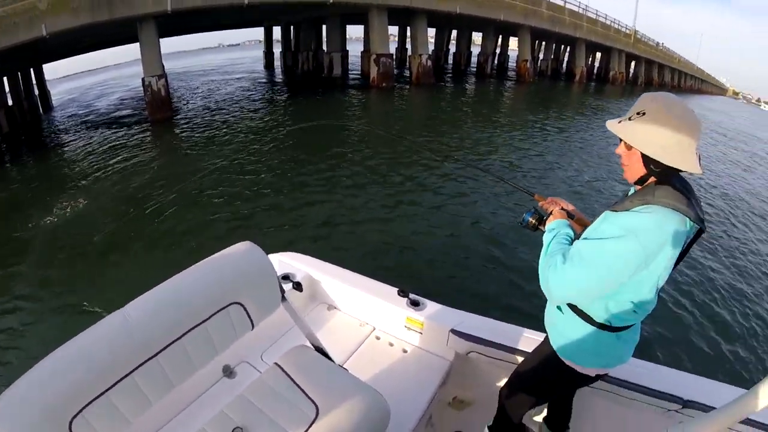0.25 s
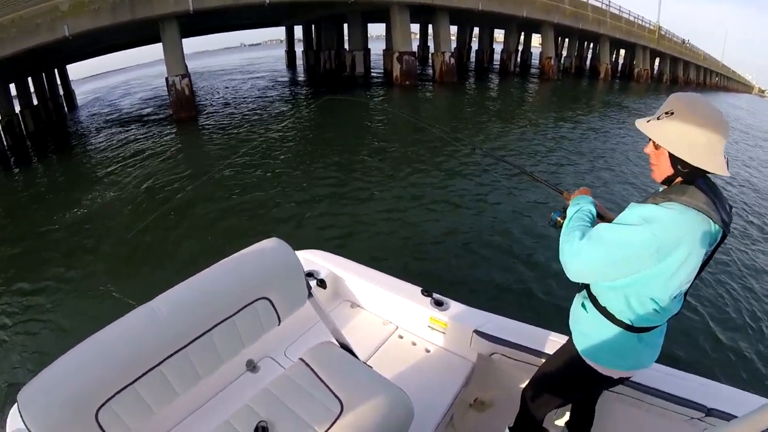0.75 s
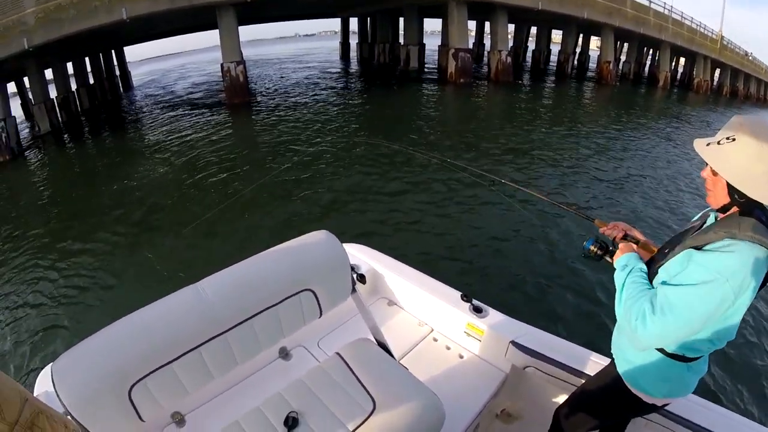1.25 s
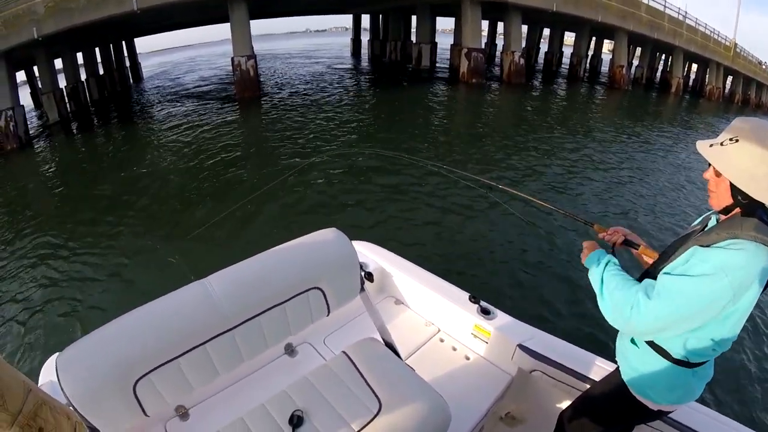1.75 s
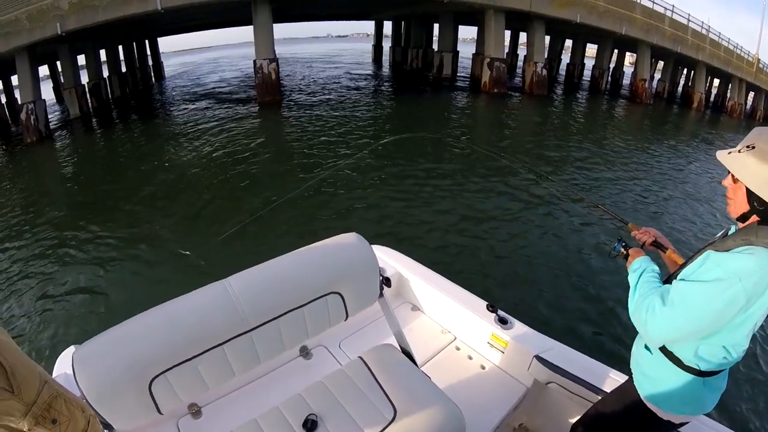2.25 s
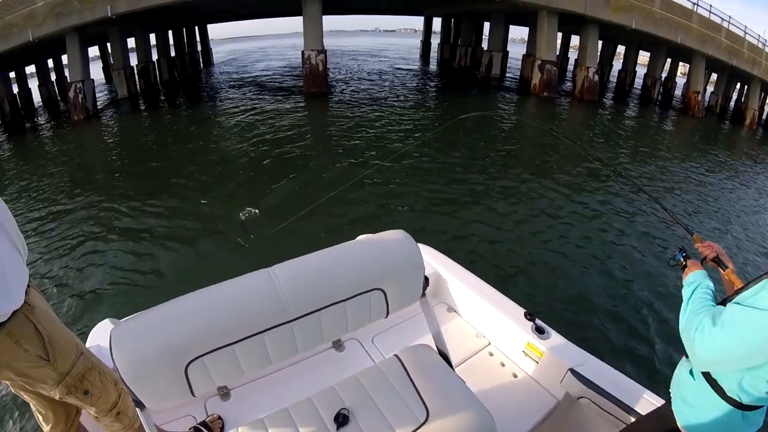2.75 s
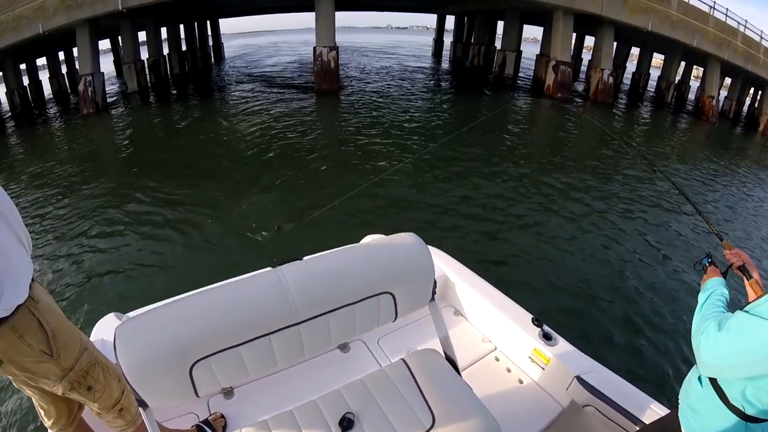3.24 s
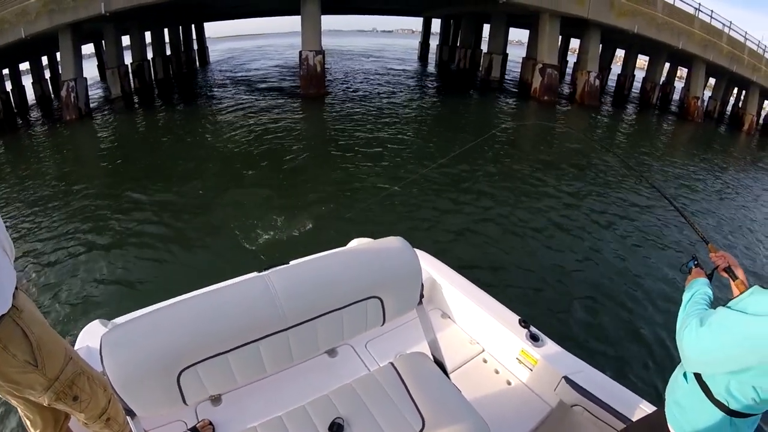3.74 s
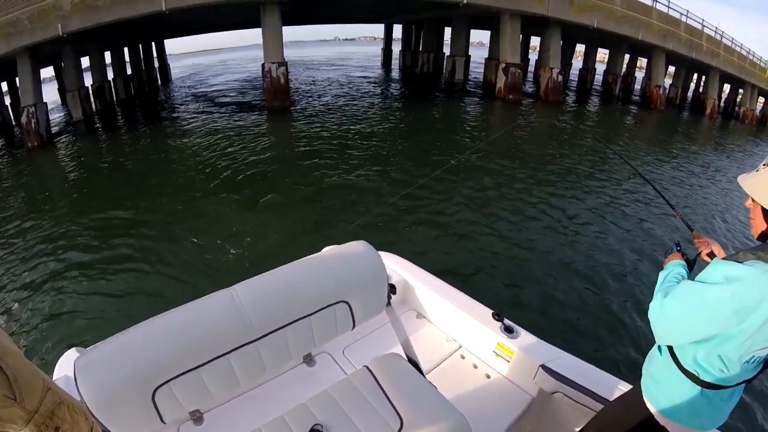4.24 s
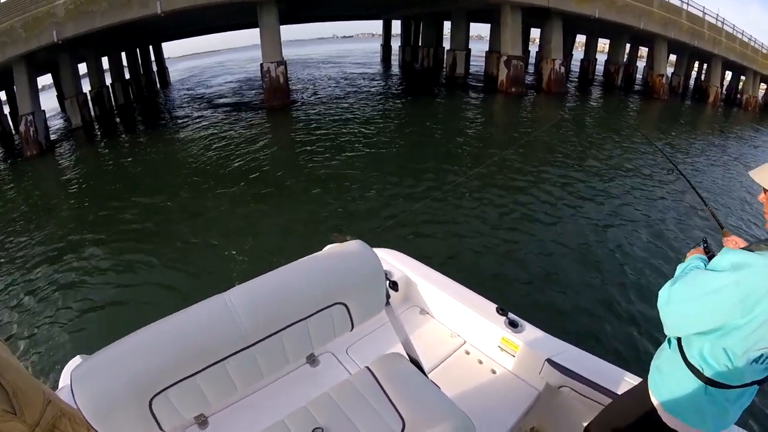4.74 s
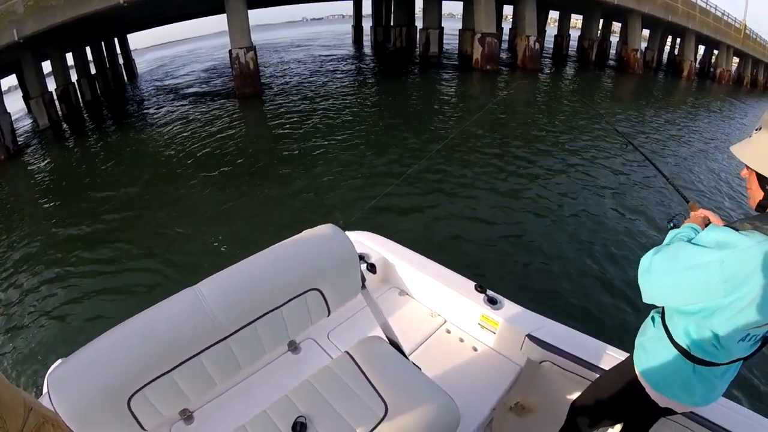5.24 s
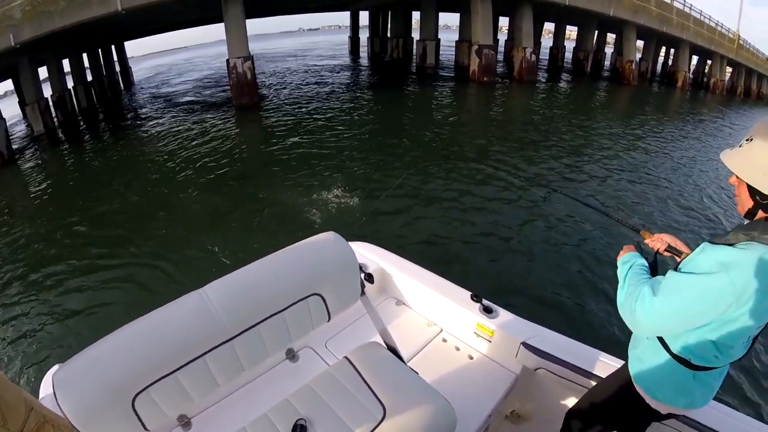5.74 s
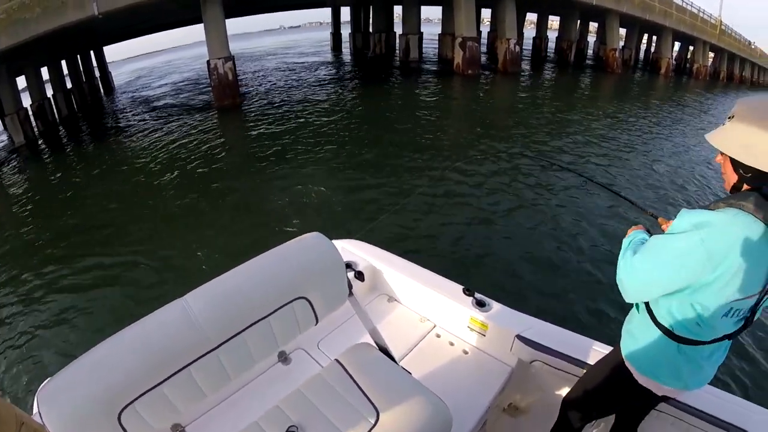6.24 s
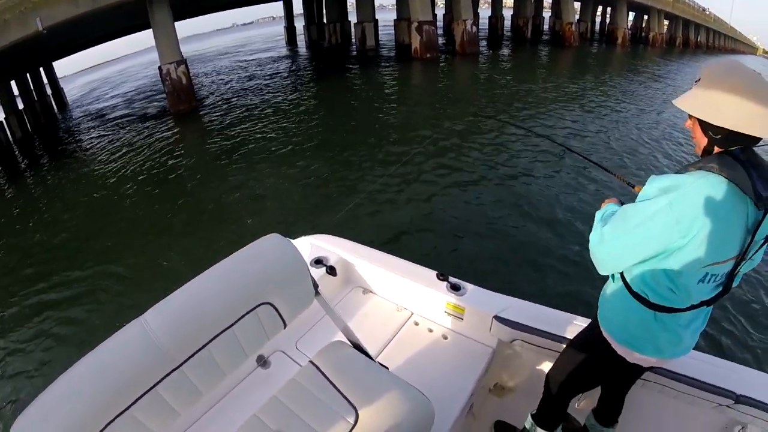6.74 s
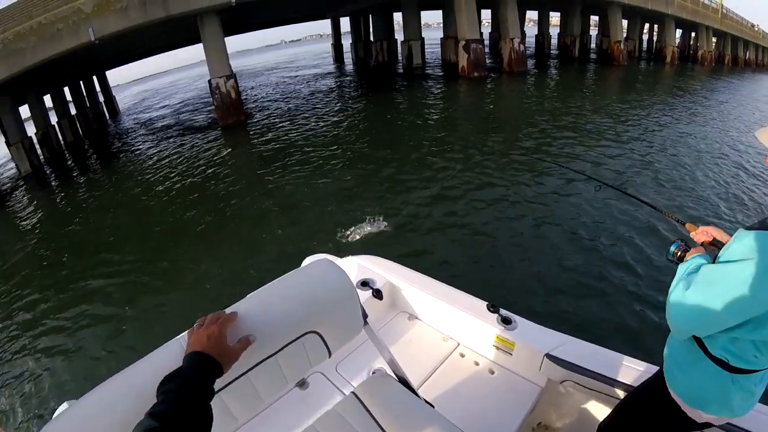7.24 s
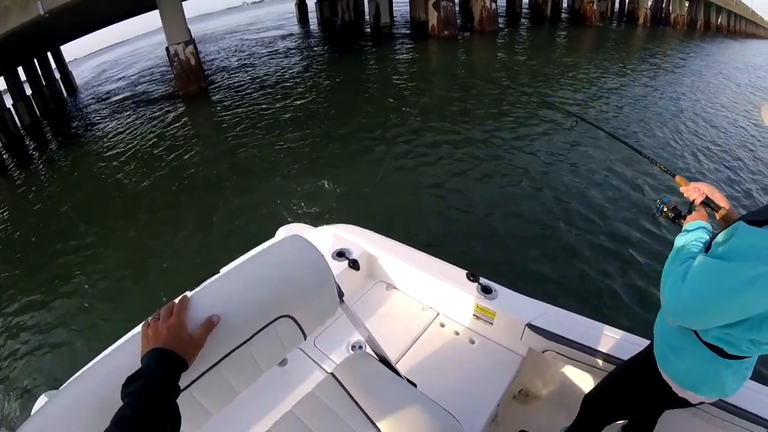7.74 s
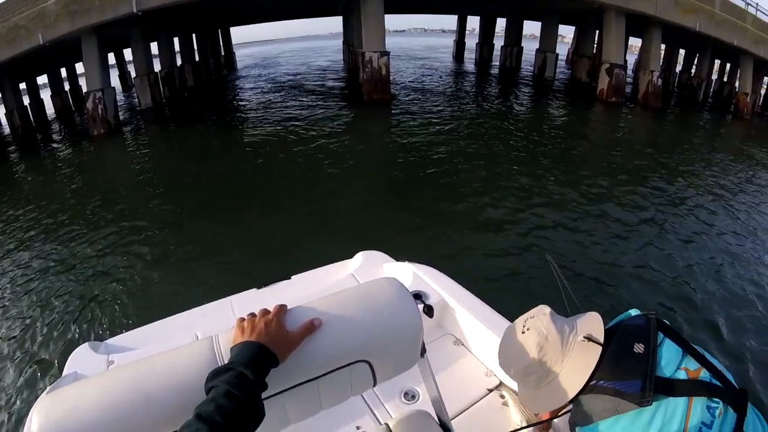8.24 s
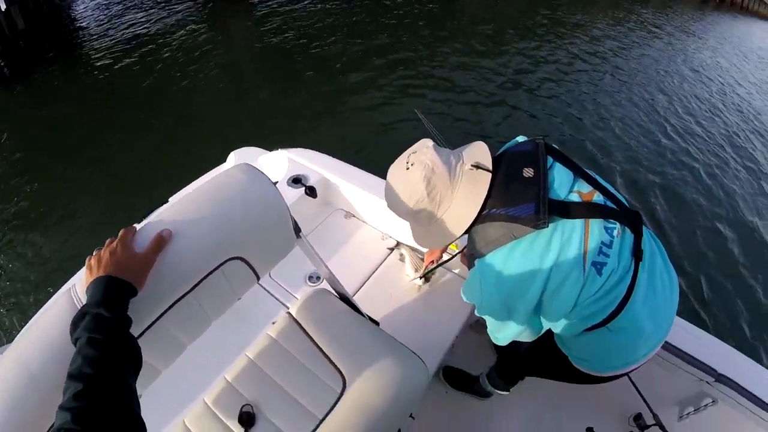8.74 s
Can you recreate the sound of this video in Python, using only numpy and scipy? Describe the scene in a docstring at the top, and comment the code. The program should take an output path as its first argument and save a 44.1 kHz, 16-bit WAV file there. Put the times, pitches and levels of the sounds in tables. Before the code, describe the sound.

An outboard idles on a small boat for about nine seconds, heard from the open deck beside a bridge. Its low hum wavers slightly in speed and level, with a wet burbling exhaust, a soft gear whirr, very thin whines and a barely audible tick. Water sloshes and fizzes steadily round the hull and piles, lapping a little more around 2.8 seconds. Light wind rumbles on the microphone, puffing near 0.8, 2.2 and 3.1. Something skips on the surface at about 3.4 to 3.8, again near 5.4, and again from 7.1 to 7.5, each with small crackling spits and pattering drops. Bubbles gulp at 5.6 and 7.9. A dull, hollow thump rings the deck at 7.7, with a softer double knock at 8.4. From about 7.6 to 8.1 the water's colour shifts as the microphone turns, while the engine idles on.

```python
"""An outboard engine idles on a small boat near a bridge: firings make a low hum that hunts a little, a burbling
wet exhaust (noise puffed by the firings), a gear whirr, thin pump whines and a faint valve tick.
Water washes round the hull and the piles as filtered noise and crackle; bubbles gulp against the hull.
Something skips on the surface three times, as bubble clusters and spits, and its drops patter back.
Light wind buffets the microphone, blows ring the deck, and the wash changes colour as the microphone turns."""
import sys
import numpy as np
from scipy import signal
from scipy.fft import rfft, irfft, next_fast_len
from scipy.io import wavfile
from scipy.ndimage import map_coordinates

SR = 44100
rng = np.random.default_rng(int(sys.argv[2]) if len(sys.argv) > 2 else 0)


def to_wav(sig):
    """Store sig (one row per channel, or 1-D mono) as 16-bit WAV at the path in sys.argv[1].

    Samples outside -1..1 are clipped; the rate is SR.
    """
    pcm = np.clip(np.atleast_2d(sig), -1, 1) * 32767
    pcm = np.round(pcm).astype(np.int16)
    wavfile.write(sys.argv[1], SR, pcm.T)  # frames by channels


N = 396459

# fine hiss of the water, also the colour of the valve tick: (frequency [Hz], relative density [dB per Hz])
FIZZ_SPECTRUM = [(2000, -6.5), (4200, -9), (5000, 2), (5500, 2.5), (6100, 0.5), (6450, 6.5), (6900, -1),
                 (9000, -8), (9550, -8), (10000, -12), (12200, -22), (14000, -12), (15600, -6.5)]


def amp(db):
    """Decibels to gain."""
    return 10 ** (np.asarray(db) / 20)


def unit(x):
    """x at rms 1."""
    return x / np.sqrt(np.mean(x ** 2) + 1e-20)


def curves(rows):
    """One value per sample for each column after the time."""
    times_s, *columns = np.transpose(rows)
    return [np.interp(np.arange(N) / SR, times_s, column) for column in columns]


def wobble(rate_hz):
    """A smooth random curve through rate_hz normal knots a second."""
    knots = rng.standard_normal(int(N * rate_hz / SR) + 4)
    return map_coordinates(knots, [np.arange(N) * rate_hz / SR])


def swells(rows):
    """Sum of Gaussian gains, one for each (time [s], spread [s], peak [dB])."""
    t = np.arange(N) / SR
    return sum(amp(db) * np.exp(-0.5 * ((t - s) / spread_s) ** 2) for s, spread_s, db in rows)


def coloured(x, spectrum):
    """x through a filter of (Hz, dB) points that keeps the power of white noise."""
    size = next_fast_len(len(x) + 8192)
    hz, db = np.transpose(spectrum)
    log_bins = np.log(np.fft.rfftfreq(size, 1 / SR) + 1)  # +1 Hz avoids log(0)
    gain = amp(np.interp(log_bins, np.log(hz), db))
    return irfft(rfft(x, size) * unit(gain), size)[:len(x)]


def noise(spectrum):
    """Coloured noise of rms 1."""
    return unit(coloured(rng.standard_normal(N), spectrum))


def crackle(rate_hz, spread_db):
    """Tiny bursting bubbles of uneven size at random times, as decaying noise bursts, at rms 1."""
    sizes = amp(spread_db * np.clip(rng.standard_normal(N), -2, 2))
    pops = (rng.random(N) < rate_hz / SR) * sizes
    power_decay = np.exp(-np.arange(SR // 100) / (SR / 1500))
    power = np.abs(signal.fftconvolve(pops ** 2, power_decay)[:N])
    return unit(np.sqrt(power) * rng.standard_normal(N))


def grains(times_s, hz, sizes, cycles):
    """Bubbles: each decays over a few cycles, rising a little in pitch."""
    t = np.arange(SR // 30) / SR
    turns = hz[:, None] * t
    tones = np.sin(2 * np.pi * turns * (1 + 0.0033 * turns))
    rings = sizes[:, None] * np.exp(-turns / cycles) * tones
    places = (times_s * SR).astype(int)[:, None] + np.arange(len(t))
    return np.bincount(places.ravel(), rings.ravel(), N)[:N]


def add(track, s, sound):
    """Mix a sound into the track at s seconds, in place."""
    part = track[round(s * SR):][:len(sound)]
    part += sound[:len(part)]


def wind():
    """A light breeze and its puffs buffet the microphone: low noise with a wavering level."""
    # strongest puffs: (time [s], spread [s], level [dB])
    gusts = [(.22, 0.16, -40), (.79, 0.15, -34.5), (2.23, 0.077, -33.5), (3.15, 0.038, -32.5),
             (4.5, .05, -37)]
    # (frequency [Hz], relative density [dB per Hz])
    buffet_spectrum = [(10, -20), (25, -6), (45, 3), (90, 1.5), (200, -1.5), (320, -11), (700, -39),
                       (2000, -72)]
    breeze = amp(-43.5 + 2 * wobble(4))  # dB
    return (breeze + swells(gusts)) * amp(0.95 * wobble(14)) * noise(buffet_spectrum)


def turning(x):
    """As the microphone turns, the sound crossfades to a filtered version of itself."""
    # (time [s], share of the turn [0-1])
    turn = [(7.6, 0.026), (8.1, 1)]
    # colour at full turn: (frequency [Hz], gain [dB])
    turned_colour = [(550, -1.5), (710, 4.5), (1050, -4), (1400, -3.5), (2100, -5), (2900, 0), (4600, 4.5),
                     (6500, 1.5), (7800, 3), (10500, 2), (14000, -4), (15600, -1)]
    share, = curves(turn)
    hz, db = np.transpose(turned_colour)
    gain = amp(np.interp(np.fft.rfftfreq(N, 1 / SR), hz, db))
    turned = irfft(rfft(x) * gain, N)
    return x + share * (turned - x)


def water():
    """Ripples slosh and wash against hull and piles under a fizz; wavelets lift the wash and the fizz."""
    # (time [s], slosh level [dB])
    slosh_level = [(0, -46.5), (1.7, -46.3), (2.1, -48), (5.4, -48.5), (6.5, -48.8), (7.5, -48.5),
                   (8.3, -46.5), (8.99, -49.5)]
    # spectra: (frequency [Hz], relative density [dB per Hz])
    slosh_spectrum = [(250, -28), (480, -2.5), (620, -1.5), (800, 2), (920, 0), (1100, -5.5), (1500, -28),
                      (3000, -56)]
    wash_spectrum = [(500, -32), (850, -2), (1060, 2.5), (1400, -3), (1800, -5), (2500, -10), (3200, -15.5),
                     (4000, -23.5), (6000, -43), (16000, -42)]
    # wavelets lapping and foaming: (time [s], spread [s], wash level [dB], fizz level [dB])
    laps = [(.15, 0.29, -51.5, -70), (1.1, 0.23, -56, -62), (1.72, .15, -60, -57.5), (2.78, 0.17, -50, -63),
            (5.47, .04, -46.5, -60), (7.17, 0.13, -52.5, -61)]
    wash_db, fizz_db = -48, -57.5  # steady levels

    slosh_db, = curves(slosh_level)
    slosh = amp(slosh_db + 0.94 * wobble(10)) * noise(slosh_spectrum)

    lapping = swells([(s, spread_s, db) for s, spread_s, db, _ in laps])
    wash_gain = np.hypot(amp(wash_db), lapping) * amp(0.4 * wobble(14))
    wash = wash_gain * unit(coloured(crackle(rate_hz=5400, spread_db=1), wash_spectrum))

    foaming = swells([(s, spread_s, db) for s, spread_s, _, db in laps])
    fizz_gain = np.hypot(amp(fizz_db), foaming) * amp(0.39 * wobble(6))
    fizz = fizz_gain * noise(FIZZ_SPECTRUM)
    return slosh + wash + fizz


def gulps():
    """Ripples trap larger pockets of air against the hull, which ring as bubbles."""
    # (time [s], level [dB], pitch [Hz])
    pockets = [(5.586, -32, 700), (7.932, -32.5, 679), (7.946, -38, 798)]
    times_s, db, hz = np.transpose(pockets)
    return grains(times_s, hz, amp(db), cycles=6)


def bumps():
    """Blows ring the deck modes briefly, with short scuffs; the softer the blow, the duller the ring."""
    # (time [s], level [dB], softness: duration of the push [s])
    blows = [(7.680, -23, .0061), (7.698, -14, .0041), (7.722, -25, .0015), (7.794, -23.5, 0.003),
             (8.404, -21, .003), (8.424, -18.5, .0021)]
    # deck modes: (frequency [Hz], level [dB], t60 [s])
    deck_modes = [(80.4, -22, 0.06), (111, -11, 0.069), (190, -2.5, 0.055), (248, -4.5, 0.068),
                  (345.3, -7.5, 0.068), (520, -10, .07), (680, -21, .06)]
    # (time [s], spread [s], level [dB])
    scuffs = [(7.71, .03, -39), (8.42, .025, -38.5)]
    # (frequency [Hz], relative density [dB per Hz])
    scuff_spectrum = [(120, -15), (260, 3), (550, -3), (900, -18), (2000, -42)]

    track = swells(scuffs) * noise(scuff_spectrum)
    t = np.arange(SR // 3) / SR
    ring = sum(amp(db - 60 * t / t60_s) * np.sin(2 * np.pi * hz * t) for hz, db, t60_s in deck_modes)
    for s, db, soft_s in blows:
        push = np.sin(np.pi * np.minimum(t / soft_s, 1)) ** 2
        add(track, s, amp(db) * signal.fftconvolve(ring, push / push.sum()))
    return track


def showers():
    """Thrown water patters back as a fine crackling spray with larger ringing drops scattered through it."""
    # (time of the thickest fall [s], spread [s], spray level [dB])
    falls = [(3.72, 0.17, -58), (5.69, .17, -54.5), (7.25, 0.1, -58), (7.6, 0.084, -55)]
    # (frequency [Hz], relative density [dB per Hz])
    spray_spectrum = [(900, -12), (1700, -8), (2800, -4), (4100, -7), (5200, 4.5), (6300, 2.5), (7500, -15),
                      (10500, -10), (12500, -23), (15500, -22)]
    drop_hz, drop_db = 5400, 5.5  # median pitch; median peak over the spray level

    track = coloured(swells(falls) * crackle(rate_hz=350, spread_db=1.0), spray_spectrum)
    for s, spread_s, db in falls:
        when, pitch, strength = np.clip(rng.standard_normal((3, 26)), -2, 2)
        sizes = amp(db + drop_db + 2.8 * strength)
        track += grains(s + spread_s * when, drop_hz * np.exp(0.12 * pitch), sizes, cycles=7.7)
    return track


def splashes():
    """Each slap on the water traps a cluster of six small bubbles and spits a brief crackle."""
    # (time [s], level [dB], median bubble pitch [Hz], length [s])
    slaps = [(2.846, -49, 5000, 0.012), (3.406, -48, 5614, 0.011), (3.433, -48.5, 6100, .012),
             (3.452, -45, 2600, .008), (3.456, -45, 6200, 0.0085), (3.526, -47, 4230, 0.0082),
             (3.53, -42, 2420, .005), (3.709, -41.5, 2700, .006), (3.796, -39.5, 5600, 0.0038),
             (5.239, -47.5, 4540, 0.013), (5.44, -46, 4100, .005), (5.454, -45.5, 3400, .018),
             (5.507, -49, 4200, .014), (7.054, -46.5, 6990, .004), (7.181, -48.5, 2770, 0.017),
             (7.191, -48, 5600, 0.01), (7.269, -51, 5284, .010), (7.326, -50, 4000, 0.0077),
             (7.487, -45, 5200, .008), (7.506, -45.5, 3300, .006)]
    # (frequency [Hz], relative density [dB per Hz])
    spit_spectrum = [(400, -14), (900, 2), (1800, 4), (2600, 4), (4200, -5), (5400, 7), (6500, 5.5),
                     (7600, -10), (10300, -6), (12300, -17), (13800, -10), (15800, -16)]
    bubbles_db, spit_db = -4.5, -1  # relative to the slap level

    spit, bubbles = np.zeros(N), np.zeros(N)
    t = np.arange(SR // 10) / SR
    for s, db, hz, length_s in slaps:
        when = rng.random(6)
        pitch, strength = rng.standard_normal((2, 6))
        cluster = grains(s + length_s * when, hz * np.exp(0.13 * pitch), amp(4.8 * strength), cycles=4.1)
        to_unit = np.sqrt(length_s * SR / np.sum(cluster ** 2))  # rms 1 over the length
        bubbles += amp(db + bubbles_db) * cluster * to_unit
        envelope = (1 - np.exp(-t / 0.0015)) * np.exp(-t / (1.26 * length_s))
        add(spit, s, amp(db + spit_db) * envelope)
    return bubbles + coloured(spit * crackle(rate_hz=3200, spread_db=8), spit_spectrum)


def lines(firings, orders, waver_db, drift_rad):
    """Multiples of the firing rate, each wavering in level and phase, at rms 1 together."""
    total = np.zeros(N)
    for k, db in orders:
        phase = 2 * np.pi * (k * firings + rng.random()) + drift_rad * k * wobble(14)
        total += amp(db + waver_db * wobble(20)) * np.sin(phase)
    return unit(total)


def engine():
    """Firings drive the hum, puff the exhaust through water and turn the gears; these three grow with speed."""
    # hunting idle: (time [s], firing rate [Hz])
    speed = [(0.0, 41.6), (0.3, 45), (0.62, 43.2), (1.08, 44.6), (1.42, 42.8), (1.65, 44.8), (1.92, 42.8),
             (2.6, 43.2), (2.85, 44.6), (3.95, 43.1), (4.2, 41.3), (4.7, 43.8), (5.28, 43), (5.6, 44.7),
             (5.98, 43.3), (6.55, 44.0), (7.2, 44), (7.55, 41.7), (7.8, 44.6), (8.05, 41.3), (8.4, 44),
             (8.7, 43.9), (8.99, 43.6)]
    # (multiple of the firing rate, relative level [dB])
    hum_orders = [(1, -16.5), (2, -2.5), (3, 1), (4, -25), (5, -23.5), (6, -16.5), (7, -22), (8, -24)]
    whirr_orders = [(9.5, 0), (9.75, -4), (10, 3.5), (10.25, -5.5)]
    # (time [s], gear whirr level at idle [dB])
    whirr_level = [(0, -48), (1.8, -50), (2.3, -45), (3.6, -48), (5.3, -46), (6.1, -48), (6.6, -44),
                   (7.6, -46), (8.99, -50.5)]
    # exhaust bubbling out under water: (frequency [Hz], relative density [dB per Hz])
    exhaust_spectrum = [(25, -28), (55, -9), (100, 3), (150, 0.5), (208, -1), (245, -2.5), (290, -6),
                        (320, -4), (385, -11.5), (520, -9.5), (640, -22), (1200, -49)]
    # pump whines: (frequency [Hz], level [dB])
    whines = [(899, -62), (2695, -76), (2920, -75)]
    idle_hz = 43.6
    hum_db, hum_db_per_hz = -31.5, 1.1  # level at idle, rise with firing rate
    burble_db, burble_db_per_hz = -36.5, 0.7
    whirr_db_per_hz = 1.2

    rate_hz, = curves(speed)
    surge_hz = rate_hz - idle_hz
    firings = np.cumsum(rate_hz) / SR

    # uneven combustion shakes the whole hum
    hum_gain = amp(hum_db + hum_db_per_hz * surge_hz + 0.6 * wobble(15))
    hum = hum_gain * lines(firings, hum_orders, waver_db=0.45, drift_rad=0.012)

    whirr_db, = curves(whirr_level)
    whirr_gain = amp(whirr_db + whirr_db_per_hz * surge_hz + 1 * wobble(7.7))
    whirr = whirr_gain * lines(firings, whirr_orders, waver_db=2.5, drift_rad=0.058)

    # one swell per firing, plus cylinder differences once in four firings
    puffs = 1 + 0.2 * np.cos(2 * np.pi * firings) + 0.065 * np.cos(np.pi * firings / 2)
    burble = amp(burble_db + burble_db_per_hz * surge_hz) * puffs * noise(exhaust_spectrum)

    # pump pitches do not follow the firing rate
    t = np.arange(N) / SR
    whine = sum(amp(db + 1.6 * wobble(3)) * np.sin(2 * np.pi * hz * t + wobble(6)) for hz, db in whines)

    # valve gear ticks once in four firings
    ticks = np.exp(2.8 * np.cos(np.pi * firings / 2))
    valves = amp(-71) * unit(ticks * noise(FIZZ_SPECTRUM))
    return hum + whirr + burble + whine + valves


def scene():
    """Everything as heard from the deck, one channel; only the water is coloured by the turn."""
    surroundings = wind() + turning(water()) + gulps() + bumps()
    skipping = showers() + splashes()
    return (surroundings + skipping + engine())[None]


def record(dry):
    """Second-order low cut at 24 Hz and a sharp band limit at 15850 Hz."""
    size = next_fast_len(N + SR // 2)
    hz = np.fft.rfftfreq(size, 1 / SR)
    low_cut = hz ** 2 / np.sqrt(hz ** 4 + 24 ** 4)
    return irfft(rfft(dry, size) * low_cut * (hz < 15850), size)[:, :N]


dry = scene()
out = record(dry)
to_wav(out)
```